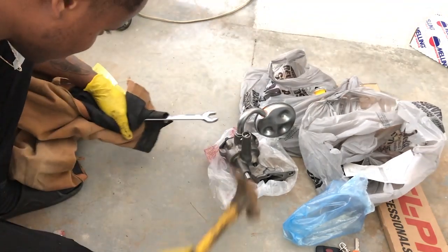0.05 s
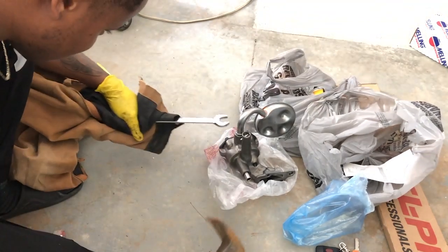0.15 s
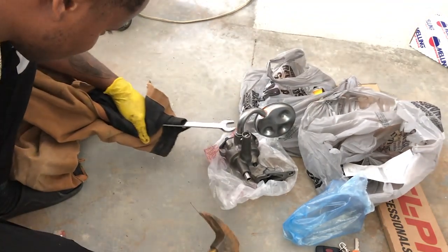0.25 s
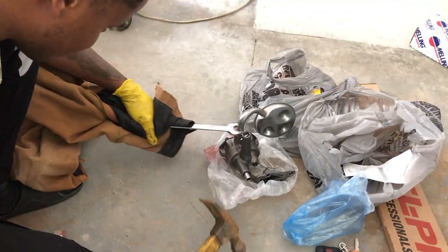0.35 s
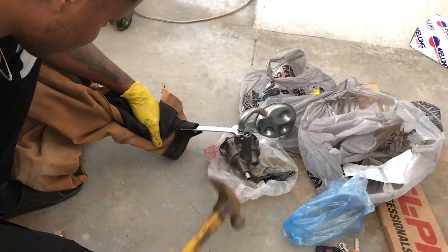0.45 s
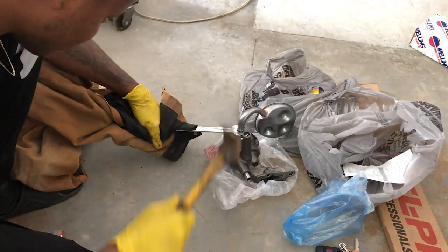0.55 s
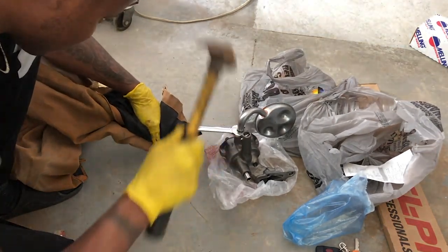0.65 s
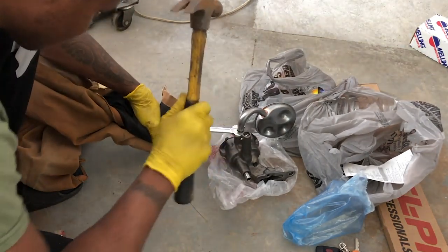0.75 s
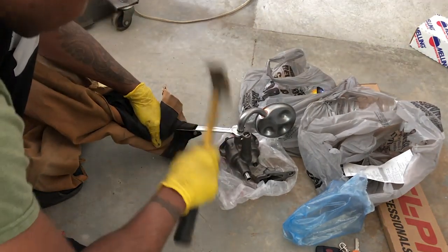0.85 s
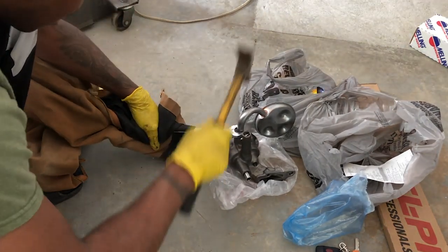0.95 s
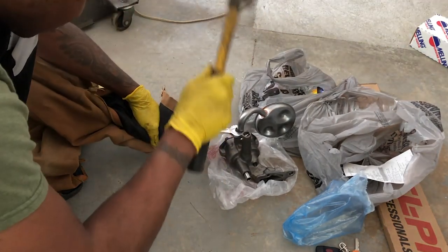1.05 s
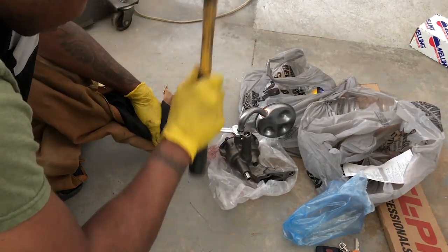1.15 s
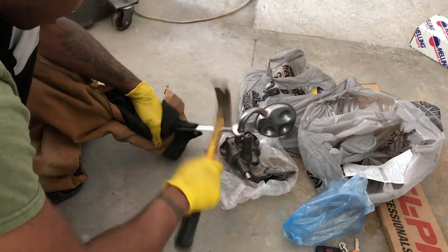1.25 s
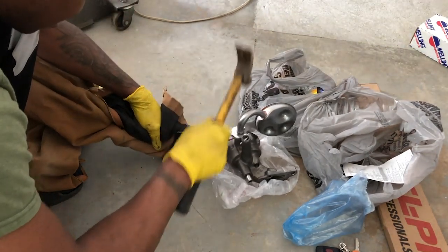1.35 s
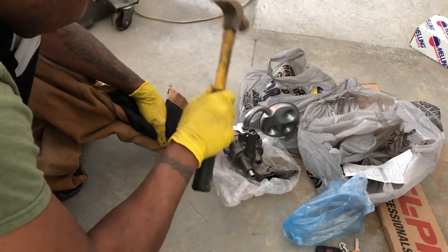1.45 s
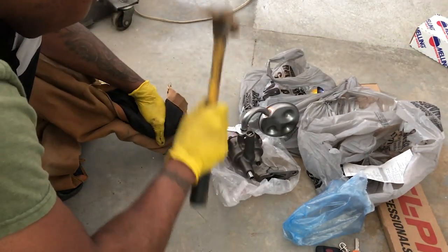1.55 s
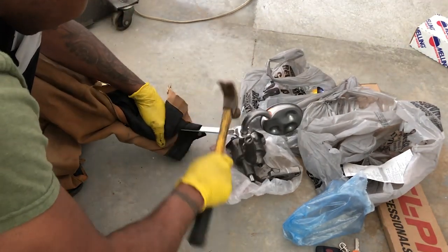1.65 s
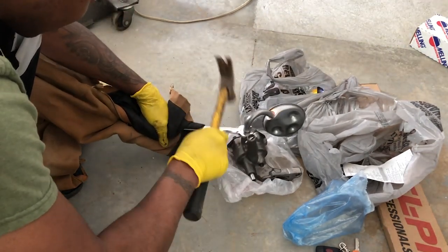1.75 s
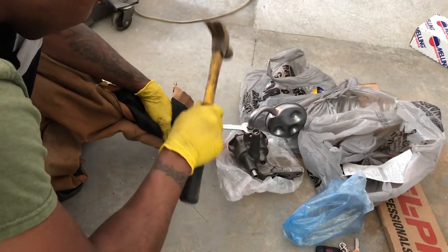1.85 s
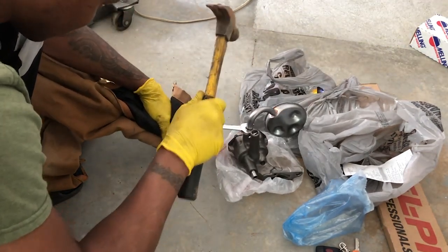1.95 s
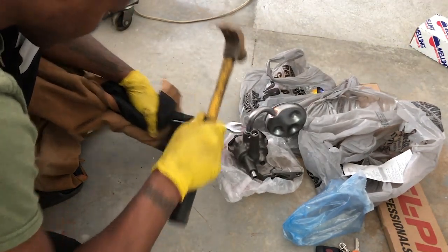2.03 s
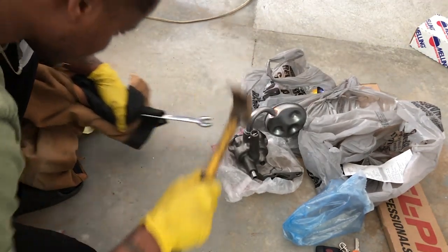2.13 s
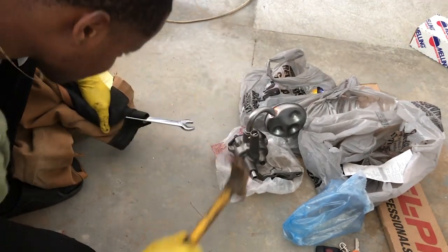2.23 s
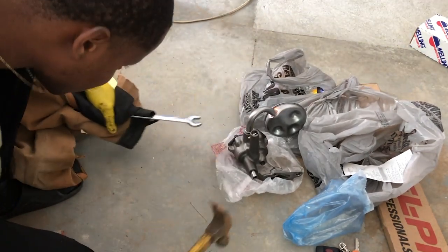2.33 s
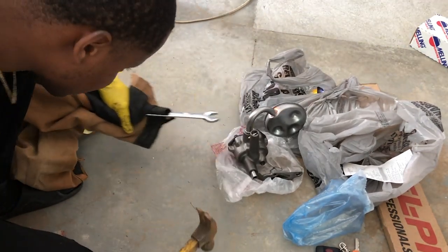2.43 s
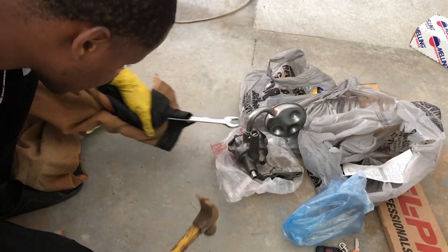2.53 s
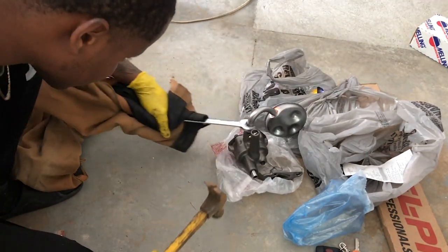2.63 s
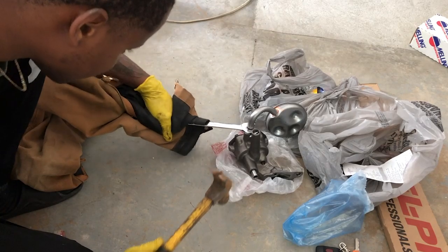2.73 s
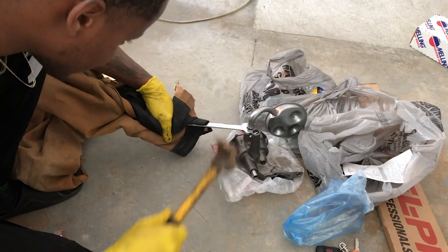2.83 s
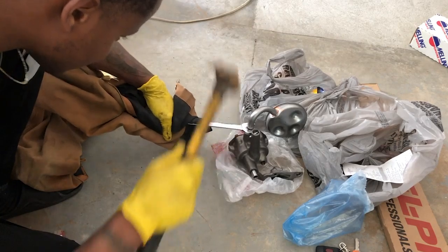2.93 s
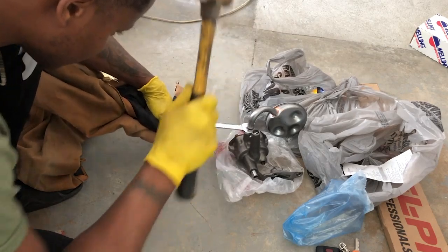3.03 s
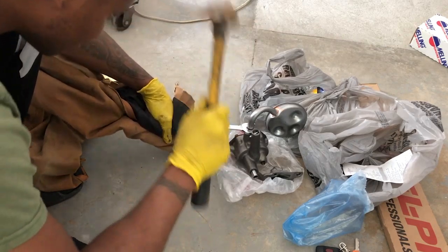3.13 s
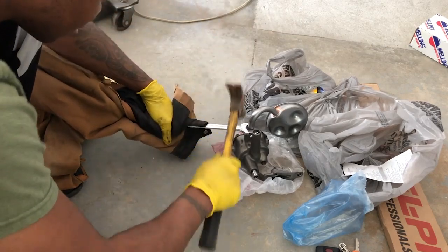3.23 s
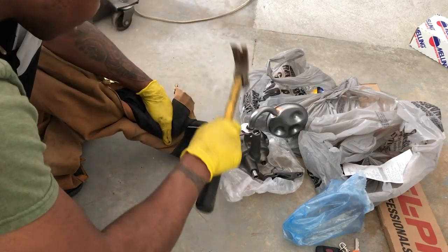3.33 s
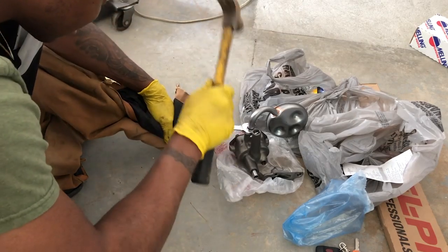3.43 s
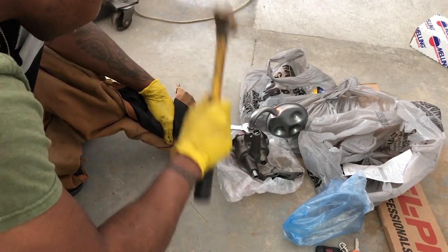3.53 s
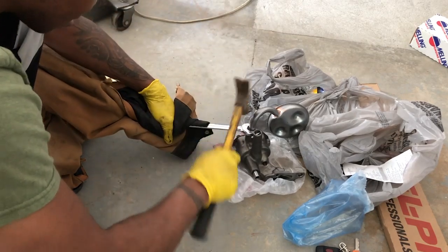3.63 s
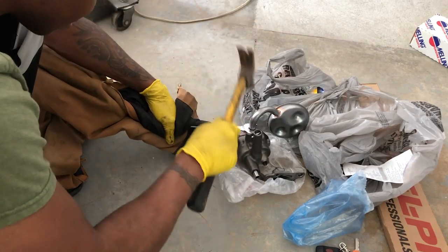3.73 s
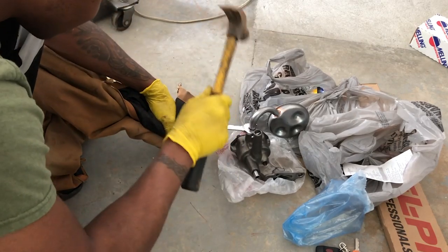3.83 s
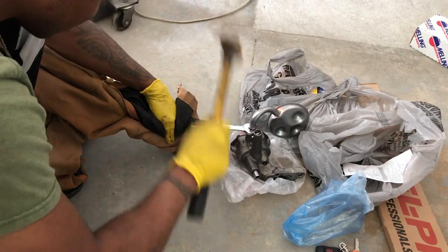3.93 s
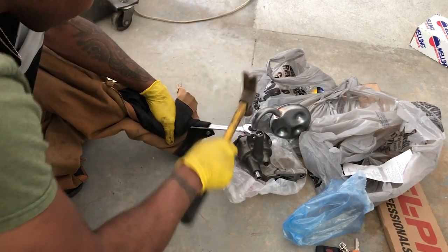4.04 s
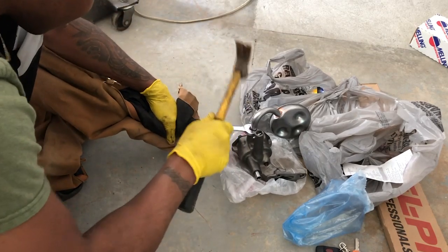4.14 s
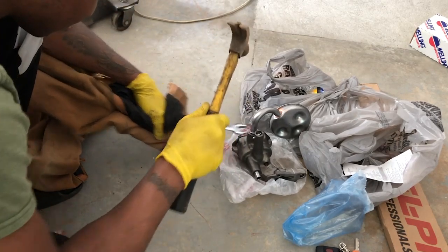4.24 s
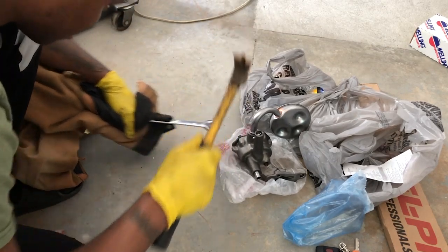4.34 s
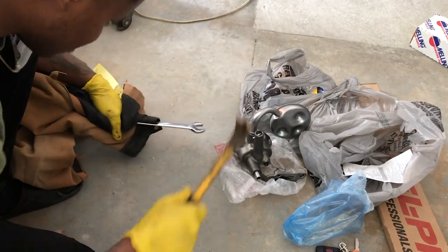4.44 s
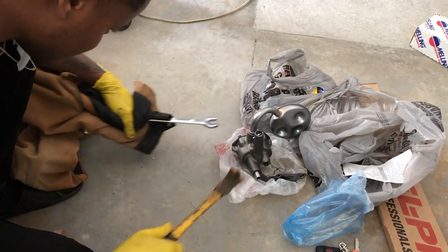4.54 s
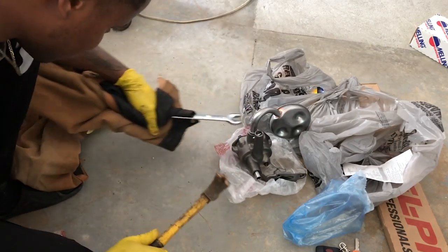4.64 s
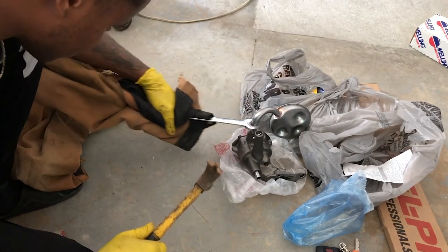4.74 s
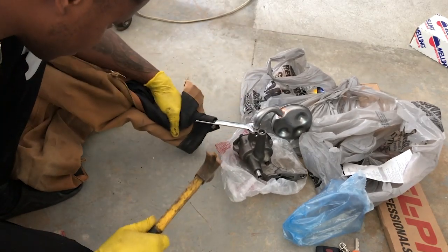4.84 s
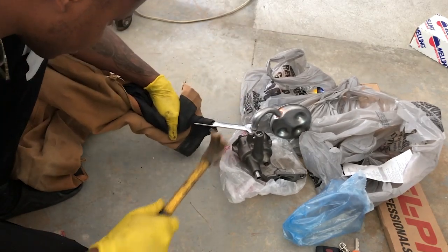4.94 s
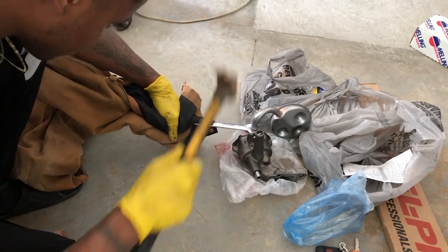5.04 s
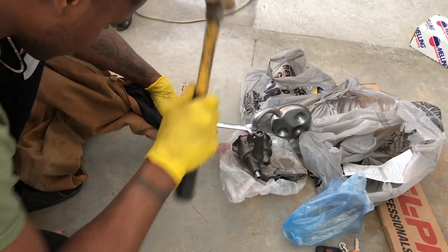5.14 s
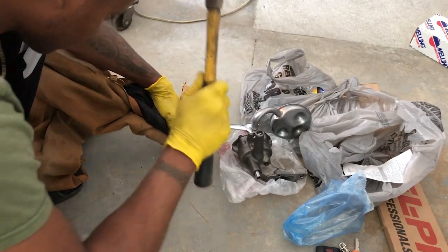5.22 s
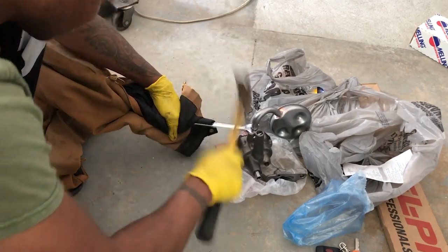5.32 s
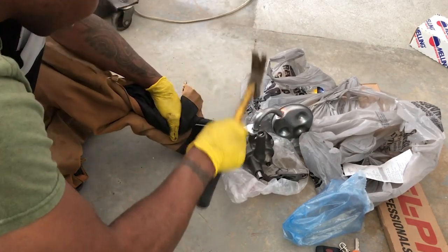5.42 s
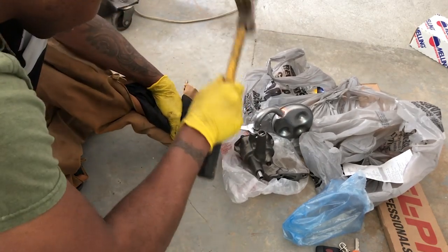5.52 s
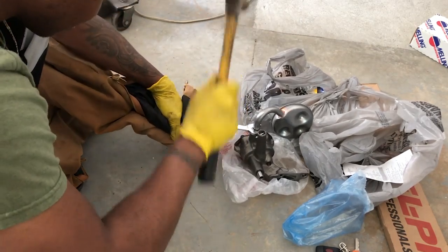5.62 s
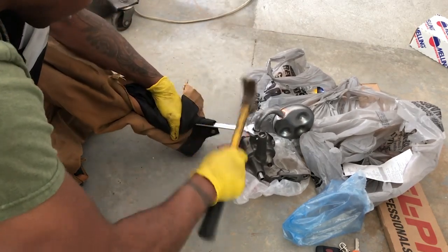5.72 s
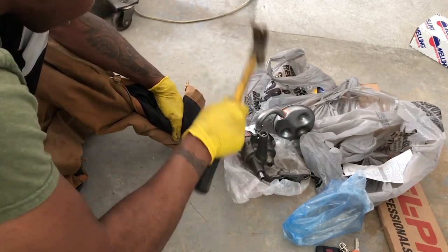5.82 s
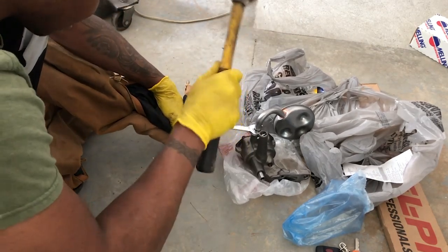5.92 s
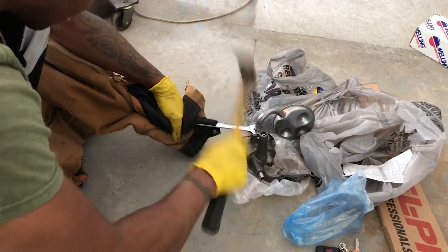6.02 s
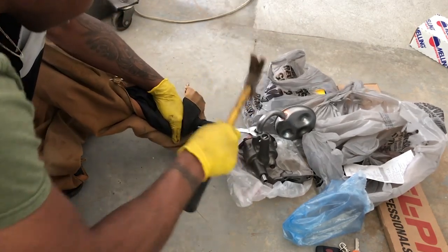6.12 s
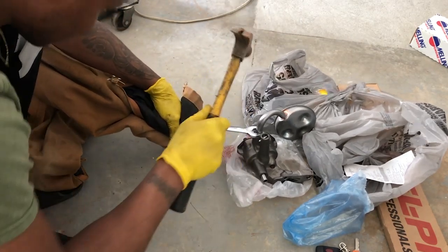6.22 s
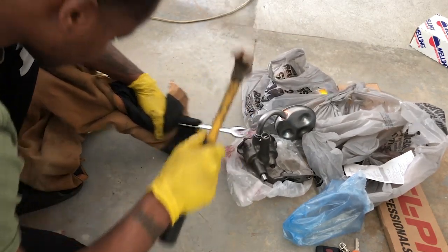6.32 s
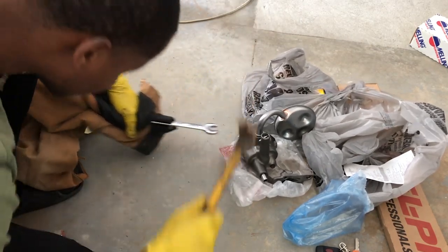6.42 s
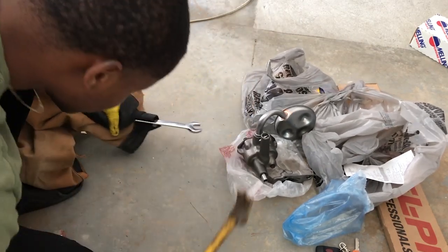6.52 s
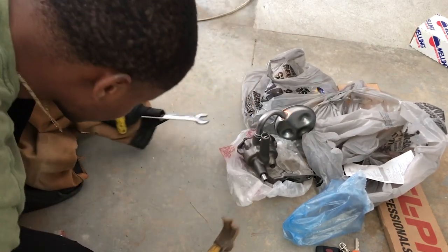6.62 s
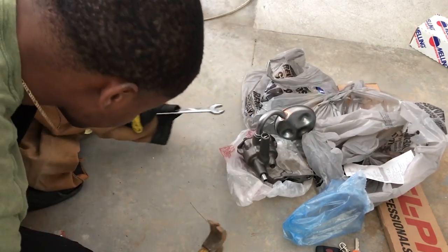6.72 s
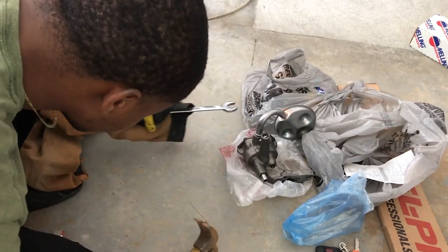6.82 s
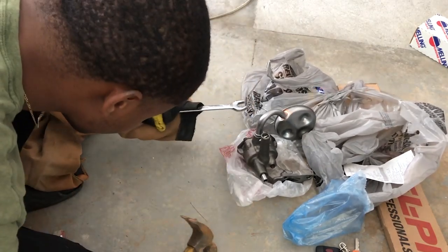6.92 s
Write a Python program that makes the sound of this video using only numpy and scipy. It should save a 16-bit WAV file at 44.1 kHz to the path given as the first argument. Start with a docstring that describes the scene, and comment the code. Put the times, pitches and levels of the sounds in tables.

```python
"""The fading tail of an earlier blow opens a bare concrete garage, over air, rumble and rustling plastic bags.
Light taps set a wrench in place, then three hard hammer blows drive a steel part through it: three rounds.
Each hard blow has a faint noise tick just ahead of it; low thumps travel up the microphone stand.
Part and wrench ring as damped modes, cracks are shaped noise, the room swells and dies, a metal shelf hums.
The recorder ducks and clips the loudest moments; a dull knock comes near the end."""
import sys
import numpy as np
from scipy import signal
from scipy.fft import rfft, irfft, next_fast_len
from scipy.io import wavfile
from scipy.ndimage import map_coordinates

SR = 44100
rng = np.random.default_rng(int(sys.argv[2]) if len(sys.argv) > 2 else 0)


def dump_mix(stems):
    """Bounce the given channels to the path in sys.argv[1] as a 16-bit WAV at rate SR."""
    frames = np.atleast_2d(stems).T  # one column per channel
    limited = np.clip(frames, -1, 1)  # hard clip at full scale
    pcm = np.round(limited * 32767).astype(np.int16)
    wavfile.write(sys.argv[1], SR, pcm)


N = 307365

# All levels are relative, ahead of the trims in the mix.
# Room noise spectrum: pitch_hz, density_db (per Hz)
AIR_SPECTRUM = [(20, -47), (36, -31), (50, -10.5), (97, -14.5), (200, -17.5), (400, -19), (900, -15),
                (2280, -25), (5280, -28.5), (6560, -36), (16000, -49.5)]
AIR_DB = -57
# Traffic or machines through the walls, level over time: time_s, level_db
RUMBLE_LEVEL = [(0, -64.5), (.8, -52), (2.15, -60), (3.24, -54.5), (4.25, -73), (5.55, -55.5),
                (6.06, -65.5), (6.39, -70), (6.97, -64)]
# Distant machine tones: pitch_hz, level_db (against the rumble)
MACHINE_HUM = [(50, -3), (99, -13), (138, -11)]
# Plastic bags, level over time: time_s, level_db
RUSTLE_LEVEL = [(0, -67), (.35, -66), (.6, -86), (.9, -59.5), (2.1, -83), (4.5, -74.5), (5.3, -91),
                (6.399, -65.5), (6.97, -73)]
# Thumps through the stand: start_s, level_db
STAND_THUMPS = [(0.939, -36.5), (1.685, -46), (3.277, -26), (3.667, -28.5), (4.043, -11), (4.064, -13.5),
                (4.272, -41), (5.767, -19), (6.098, -19.5)]
SWAY_DELAY_S, SWAY_HZ = 0.024, 63.4
# Faint ticks ahead of the hard blows: start_s, level_db
FAINT_TICKS = [(0.917, -32), (1.2973, -33), (1.664, -36), (3.2551, -30.5), (3.643, -39.5), (4.02, -41),
               (5.3688, -34), (5.74, -38), (6.078, -41)]

# Decay of the room: pitch_hz, t60_s
GARAGE_DECAY = [(100, 0.61), (260, 0.66), (700, 0.77), (1800, 0.9), (4800, 0.72), (9000, 0.49),
                (15000, 0.28)]
# What the walls return: pitch_hz, level_db
WALL_RETURN = [(100, 7), (300, -4.5), (900, 8), (2000, -6.5), (5000, -0.5), (10000, -5.5), (16000, 2)]
# Modes of the sheet metal shelf nearby: pitch_hz, level_db, t60_s
SHELF_MODES = [(262.2, -7.5, 0.048), (508.5, -15, 0.061), (788, -6, 0.074), (858, -7, 0.12),
               (920.5, -0.5, 0.072), (944, -7, 0.1), (1011.6, -4, 0.065)]

# Modes of the struck steel part: pitch_hz, width_hz, level_db (spectral peak)
PART_MODES = [(1582, 65, -5.5), (1910, 42, -11.5), (2250, 39, -4), (2563, 32, 5.5), (3037, 110, -8),
              (3970, 84, 1), (4164, 54, -2.5), (4806, 190, -4.5), (5230, 41, -10.5), (5324, 49, 1.5),
              (6640, 110, -7), (7144, 130, 1.5), (7380, 300, -11), (8615, 140, 2.5), (9273, 160, 3.5),
              (9600, 70, -19), (10700, 27, 0), (11780, 40, -1.5), (12980, 520, -5), (13640, 72, -5),
              (14540, 120, -4), (15700, 42, -12.5)]
# Modes of the wrench in a contact: pitch_hz, level_db, t60_s
WRENCH_MODES = [(948, -20, 0.11), (1617, -14.5, 0.25), (1960, 0, 0.026), (2278, -9.5, .06),
                (3030, -26.5, 0.33), (3686, -15.5, 0.11), (3867, -7.5, 0.042), (4206, -13, 0.11),
                (4756, -4.5, 0.051), (5100, -7, 0.079), (6270, -5.5, 0.06), (7210, -15, 0.099),
                (8200, -3.5, .03), (8600, -28, 0.13), (10540, -26.5, .05), (11520, -36.5, .15),
                (13100, -31, .08), (14500, -25.5, 0.055)]
# Spectrum of the chattering surfaces: pitch_hz, density_db (per Hz)
CRACK_SPECTRUM = [(88, -53.5), (150, -4.5), (1480, -3.5), (2020, 1), (3350, -6), (9080, -3.5),
                  (13700, -12.5), (15100, -11), (16000, -22.5)]
# Free wrench bending across its flat: pitch_hz, level_db, t60_s
FLATWISE_MODES = [(954, -3, .33), (935, -3.5, 0.21), (8500, -28, .6), (13100, -33, .3)]
# Free wrench bending along its edge: pitch_hz, level_db, t60_s
EDGEWISE_MODES = [(1636, 0.5, .48), (3060, -13, 0.49)]
LINGER_DB, LINGER_T60_S = -20, 0.15  # the clack of a tap sings on

# Hard blows and rebounds; the first falls before the start and only its tail is heard:
# start_s, level_db, brightness_db (per octave), clack_hz, clack_db, room_db, shelf_db
HARD_BLOWS = [(-.566, 11, 0.5, 2460, -18, -4, 2), (.94, 3, 1.5, 7900, -19, -1.5, -5),
              (1.32, 7.5, 3, 8260, -10.5, -8, -8), (1.339, -7, -1, 8900, -13, -7.5, 0.5),
              (1.685, 3, 2, 1865, -6, -3.5, -4), (1.688, -7, 4, 11000, 2.5, 2, -8.5),
              (3.278, 0.5, 2.47, 2460, -17, -3, 1.5), (3.667, -0.5, 2.03, 2400, -16, -2.5, 0),
              (4.043, -1, 3, 2500, -16, 1, 0), (5.39, 3.5, 3, 1774, -9.5, -3.5, -3),
              (5.762, 2, 1.45, 1950, -20.5, -3, -1.5), (6.097, 1.5, 0.1, 1740, -4, -2.5, 2)]
BLOW_PART_DB, BLOW_WRENCH_DB, BLOW_CRACK_DB, BLOW_CRACK_T60_MS = -2, -13.5, 1.72, 29.4
# Light taps on the loosely held wrench: start_s, level_db, brightness_db (per octave),
# clack_hz, clack_db, room_db, wrench_db, flatwise_db (song), edgewise_db (song)
LIGHT_TAPS = [(.222, -28.5, -0.5, 4140, 6, -19, -14, -45, -42.5),
              (.364, -17.5, 1.3, 4210, -4, -6, -6.5, -22, -37.5),
              (.405, -30, -10, 4340, -5, -5, -4, -40.5, -40),
              (.468, -20, 1, 6130, -7.5, -12.5, -12.5, -34.5, -40),
              (.473, -12, -1, 1967, -10, -11, -0.5, -12.5, -25),
              (2.651, -11.5, -0.5, 4050, -8.5, -4, -5, -33, -35.5),
              (2.663, -16.5, 1, 4680, -1.5, -21, 4, -38.5, -8),
              (2.718, -9.5, 1.4, 4920, -18, -14, 7, -18.5, -22),
              (2.761, -3.5, 1.5, 9600, -9, -10.5, -13, -36, -38.5),
              (4.751, -13.5, -0.5, 6130, -6, -8, -1, -42.5, -18.5),
              (4.817, -9, .7, 6020, -3, -12, 2.5, -21, -43),
              (4.876, -11, 1.5, 8950, -6.5, -13.5, -8, -49.5, -48)]
TAP_PART_DB, TAP_CRACK_DB, TAP_CRACK_T60_MS, TAP_SHELF_DB = -9.5, -5, 38, -10.5
# Dull knocks that leave the steel nearly still: start_s, level_db, clack_hz, brightness_db (per octave)
DULL_KNOCKS = [(.224, -30.5, 270, -10), (5.31, -35, 700, -6), (6.861, -20, 1320, -7.5)]
# Make-up shared by the knocks: part_db, wrench_db, crack_db, clack_db, crack_t60_ms, room_db, shelf_db
KNOCK_MAKEUP = (-13.5, -26.5, 2.5, -2, 21, -8, -24)

LEAD_S = 1  # room ahead of zero for the earlier blow
DUCKING = 0.12  # exponent of the gain reduction
TOP_HZ = 16100  # upper band limit


def amp(db):
    """Decibels to amplitude."""
    return 10 ** (np.asarray(db) / 20)


def unit(x):
    """Scale to an RMS of 1."""
    return x / np.sqrt(np.mean(x ** 2) + 1e-20)


def along(points, hz):
    """Read (Hz, value) points along a log frequency axis."""
    f, v = np.transpose(points)
    return np.interp(np.log(hz + 1), np.log(f + 1), v)


def filtered(x, response):
    """Filter x with a response given as a function of frequency."""
    m = next_fast_len(len(x) + SR // 4)
    return irfft(rfft(x, m) * response(np.fft.rfftfreq(m, 1 / SR)), m)[:len(x)]


def wobble(rate):
    """A smooth random curve, rate knots a second."""
    knots = rng.standard_normal(int(N * rate / SR) + 4)
    return map_coordinates(knots, [np.arange(N) * rate / SR])


def room_air():
    """Steady room noise, shaped by its spectrum and drifting slightly in level."""
    noise = unit(filtered(rng.standard_normal(N), lambda f: amp(along(AIR_SPECTRUM, f))))
    return amp(AIR_DB + 0.4 * wobble(2.7)) * noise


def machine_rumble():
    """Low noise through the walls with hum tones that waver in level and phase."""
    t = np.arange(N) / SR
    spectrum = [(30, -42), (48, -2.5), (140, -7.5), (300, -32.5), (600, -56.0)]  # (Hz, dB)
    mix = unit(filtered(rng.standard_normal(N), lambda f: amp(along(spectrum, f))))
    for hz, db in MACHINE_HUM:
        mix += amp(db + 1.3 * wobble(5.6)) * np.sin(2 * np.pi * hz * t + 0.43 * wobble(2))
    return amp(np.interp(t, *np.transpose(RUMBLE_LEVEL))) * mix


def bags():
    """Thin plastic creases in clumps of tiny clicks: bright noise under fast and slow random swells."""
    time_s, level_db = np.transpose(RUSTLE_LEVEL)
    creases = rng.standard_normal(N) * amp(5 * wobble(170) + 3.5 * wobble(11))
    spectrum = [(1500, -30.0), (6000, 1), (14000, -3.0)]  # (Hz, dB)
    bright = filtered(creases, lambda f: amp(along(spectrum, f)))
    return amp(np.interp(np.arange(N) / SR, time_s, level_db)) * unit(bright)


def thumps():
    """Each jolt travels through the slab and up the stand: quick ripples arrive first, the slow sway last."""
    out = np.zeros(N + SR)
    u = np.arange(1, SR // 8) / SR / SWAY_DELAY_S + 0.048  # time in units of the sway delay
    swell = np.where(u < 1, u ** 0.43, np.exp(-((u - 1) / 0.83) ** 2))
    # pitch falls as 1 / time
    jolt = swell * np.cos(2 * np.pi * SWAY_HZ * SWAY_DELAY_S * np.log(u))
    for start_s, level_db in STAND_THUMPS:
        out[round(start_s * SR):][:len(u)] += amp(level_db) * jolt
    return filtered(out[:N], lambda f: f ** 4 / (f ** 4 + 30 ** 4))


def ticks():
    """A thin double tick, two short humps of noise, runs about 20 ms ahead of each hard blow."""
    out, t = np.zeros(N), np.arange(SR // 42) / SR
    first = np.exp(-((t - 0.002) / 0.004) ** 2)
    second = 0.4 * np.exp(-((t - 0.014) / 0.0028) ** 2)
    shape = first + second + 0.28
    for start_s, level_db in FAINT_TICKS:
        out[round(start_s * SR):][:len(t)] += amp(level_db) * shape * rng.standard_normal(len(t))
    spectrum = [(800, -9.5), (2500, -2.0), (9000, -1.5), (16000, -3.5)]  # (Hz, dB)
    return filtered(out, lambda f: amp(along(spectrum, f)))


def garage(x, swell):
    """The walls are far: their answer swells (seconds), then each frequency dies at its own speed."""
    hz, t, noise = signal.stft(rng.standard_normal(SR + SR // 2), SR, nperseg=128)
    fall = amp(along(WALL_RETURN, hz)[:, None] - 60 * t / along(GARAGE_DECAY, hz)[:, None])
    rise = 0.18 + 1.0 * (1 - np.exp(-(t / swell) ** 3))
    tail = signal.istft(noise * fall * rise, SR, nperseg=128)[1]
    return signal.fftconvolve(x, tail / np.linalg.norm(tail))


def singing():
    """After a tap the loose wrench sings on in clear damped tones, blurred by the room."""
    out, t = np.zeros(N + 3 * SR), np.arange(SR) / SR
    for start_s, level_db, _, clack_hz, clack_db, _, _, flat_db, edge_db in LIGHT_TAPS:
        modes = [(clack_hz, clack_db + LINGER_DB, LINGER_T60_S)]
        modes += [(hz, db + flat_db, t60) for hz, db, t60 in FLATWISE_MODES]
        modes += [(hz, db + edge_db, t60) for hz, db, t60 in EDGEWISE_MODES]
        tone = sum(amp(level_db + db - 60 * t / t60) * np.sin(2 * np.pi * hz * t) for hz, db, t60 in modes)
        tone = tone * (1 - np.exp(-t / 0.0017))  # soft onset
        wet = amp(-3.5) * garage(tone, swell=0.01)
        wet[:SR] += tone
        out[round(start_s * SR):][:len(wet)] += wet
    return out[:N]


def ringing(hz, db, t60, t, scatter_db, attack=0.0001):
    """Damped modes with new random strengths at every strike, scaled to peak 1."""
    level = amp(db + scatter_db * rng.standard_normal(len(hz)))
    modes = amp(-60 * t / t60[:, None]) * np.sin(2 * np.pi * hz[:, None] * t)
    x = level @ modes * (1 - np.exp(-t / attack))
    return x / np.max(np.abs(x))


def contact(part_db, wrench_db, crack_db, tilt_db, clack_hz, clack_db, crack_ms):
    """Steel on steel: part and wrench ring, the surfaces chatter briefly, the contact spot clacks."""
    t = np.arange(SR // 2) / SR

    def tilt(f):
        """A squarer, harder blow reaches the higher modes."""
        return tilt_db * np.log2((f + 100) / 4000)

    hz, width, db = np.transpose(PART_MODES)
    # a wide mode dies fast and needs a stronger start for the same spectral peak
    start_db = db + 20 * np.log10(width) + tilt(hz)
    part = ringing(hz, start_db, np.log(1000) / np.pi / width, t, scatter_db=2.0)
    hz, db, t60 = np.transpose(WRENCH_MODES)
    wrench = ringing(hz, db + tilt(hz), t60, t, scatter_db=3)
    steel = amp(part_db) * part + amp(wrench_db) * wrench

    fade = amp(-60000 * t / crack_ms) * (1 - np.exp(-t / 0.00044))
    hiss = unit(filtered(rng.standard_normal(len(t)), lambda f: amp(along(CRACK_SPECTRUM, f) + tilt(f))))
    crack = amp(crack_db) * 0.39 * hiss * fade
    # three close tones roughen the clack
    spot = sum(np.sin(2 * np.pi * ratio * clack_hz * t) for ratio in (0.97, 1, 1.035)) / 2
    return steel, crack, amp(clack_db) * spot * fade


def contacts():
    """Blows, taps and knocks as rows: start, level, the seven settings of contact(), room, shelf."""
    rows = []
    for start_s, level_db, tilt_db, clack_hz, clack_db, room_db, shelf_db in HARD_BLOWS:
        rows.append((start_s, level_db, BLOW_PART_DB, BLOW_WRENCH_DB, BLOW_CRACK_DB,
                     tilt_db, clack_hz, clack_db, BLOW_CRACK_T60_MS, room_db, shelf_db))
    for start_s, level_db, tilt_db, clack_hz, clack_db, room_db, wrench_db, *_ in LIGHT_TAPS:
        rows.append((start_s, level_db, TAP_PART_DB, wrench_db, TAP_CRACK_DB,
                     tilt_db, clack_hz, clack_db, TAP_CRACK_T60_MS, room_db, TAP_SHELF_DB))
    part_db, wrench_db, crack_db, clack_db, crack_ms, room_db, shelf_db = KNOCK_MAKEUP
    for start_s, level_db, clack_hz, tilt_db in DULL_KNOCKS:
        rows.append((start_s, level_db, part_db, wrench_db, crack_db,
                     tilt_db, clack_hz, clack_db, crack_ms, room_db, shelf_db))
    return rows


def hammering():
    """Every contact, direct and through the room; the jolt also sets the shelf humming."""
    out = np.zeros(N + 4 * SR)
    for start_s, level_db, *makeup, room_db, shelf_db in contacts():
        steel, crack, clack = amp(level_db + 2.5) * np.array(contact(*makeup))
        t = np.arange(len(steel)) / SR
        hum = ringing(*np.transpose(SHELF_MODES), t, scatter_db=2.5, attack=0.0053)
        shelf = amp(level_db + shelf_db - 17.5) * hum
        # the crack spreads all round; ring and clack are beamed, so the walls get less of them
        to_walls = amp(room_db + 3) * (0.99 * steel + 1.22 * crack + 0.33 * clack)
        wet = garage(to_walls + amp(2.5) * shelf, swell=0.018)
        wet[:len(steel)] += steel + crack + clack + amp(-0.5) * shelf
        out[round((start_s + LEAD_S) * SR):][:len(wet)] += wet
    # small steel parts radiate little bass
    return filtered(out[LEAD_S * SR:][:N], lambda f: 1j * f / (150 + 1j * f))


def scene():
    """Sum all sources into one channel."""
    background = room_air() + machine_rumble() + bags() + thumps()
    return (background + ticks() + singing() + hammering())[None]


def record(dry):
    """Gain control ducks a few ms late after a loud blow, so the converter clips first; then the band limit."""
    t = np.arange(SR // 10) / SR / 0.0041  # time in units of 4.1 ms
    memory = t * np.exp(-t)
    power = np.abs(signal.fftconvolve(dry[0] ** 2, memory / memory.sum())[:N])
    ducked = dry[0] / (1 + power / 0.24) ** DUCKING
    clipped = ducked / (1 + np.abs(ducked / 0.82) ** 6) ** (1 / 6)
    return filtered(clipped, lambda hz: 1 / (1 + (hz / TOP_HZ) ** 120))[None]


dry = scene()
out = record(dry)
dump_mix(out)
```